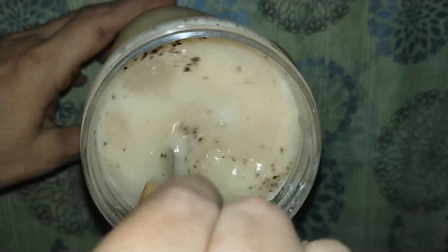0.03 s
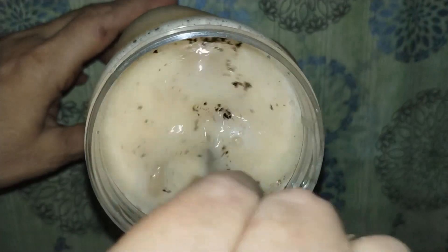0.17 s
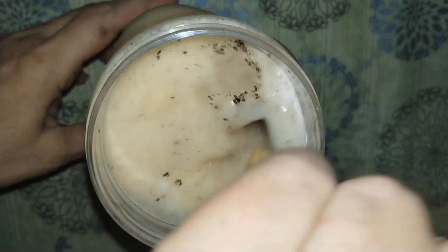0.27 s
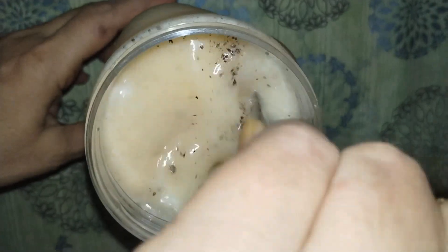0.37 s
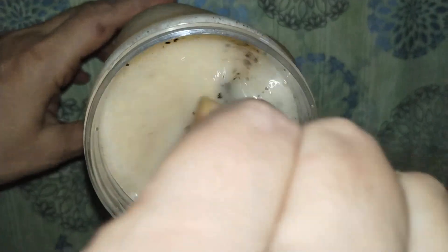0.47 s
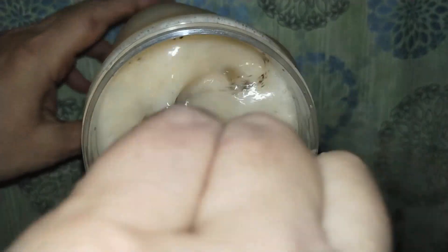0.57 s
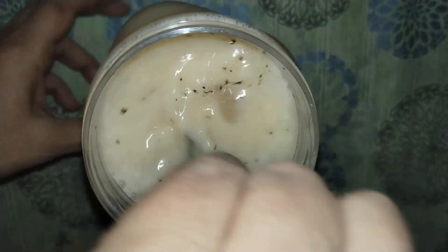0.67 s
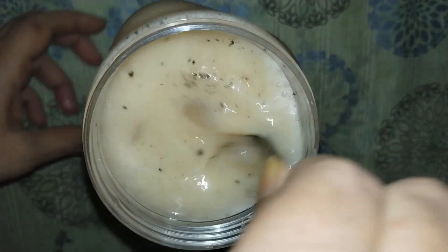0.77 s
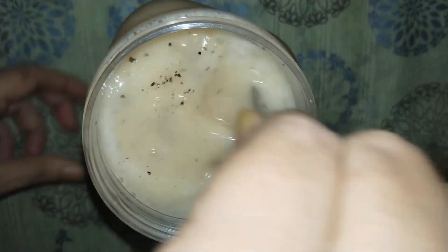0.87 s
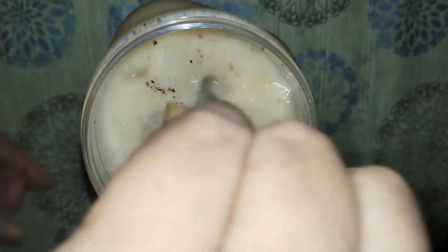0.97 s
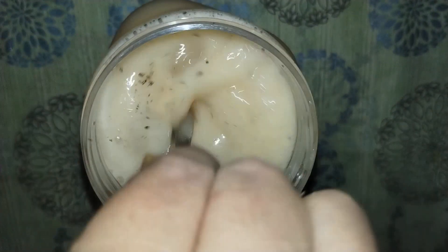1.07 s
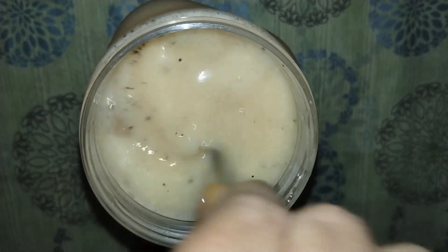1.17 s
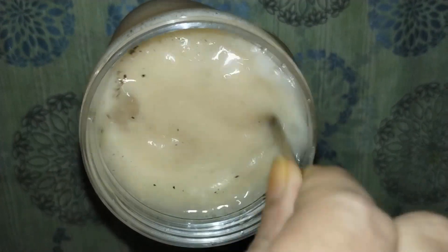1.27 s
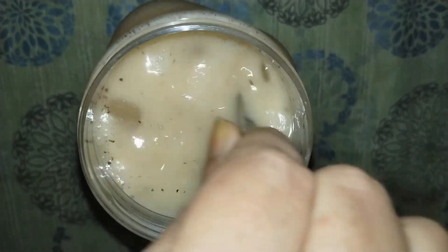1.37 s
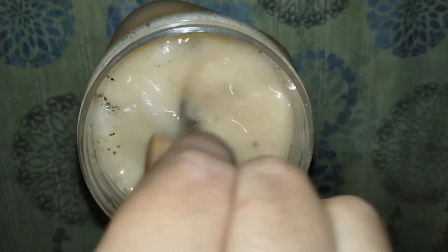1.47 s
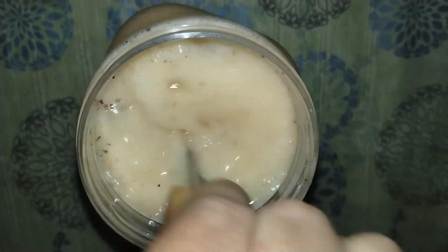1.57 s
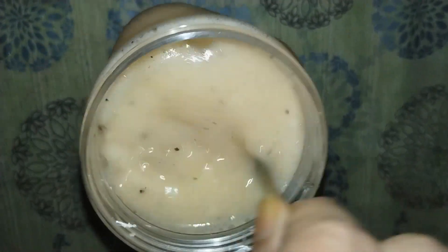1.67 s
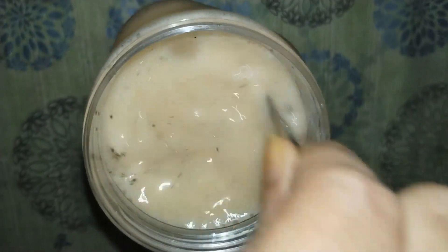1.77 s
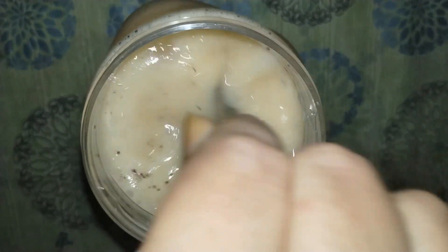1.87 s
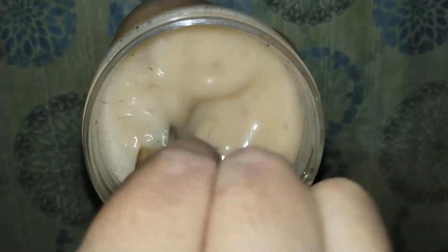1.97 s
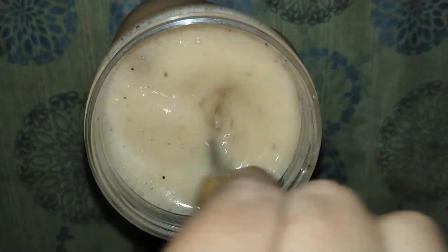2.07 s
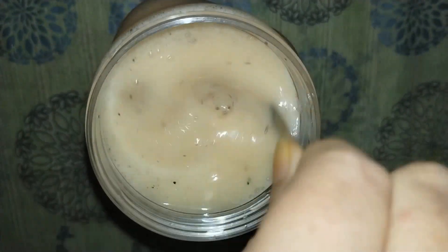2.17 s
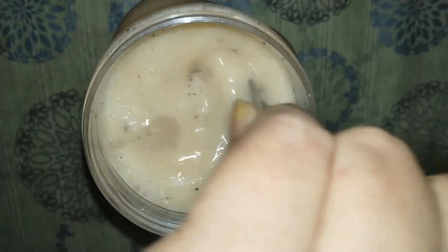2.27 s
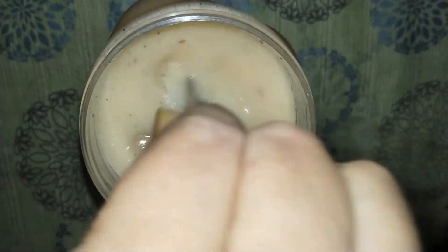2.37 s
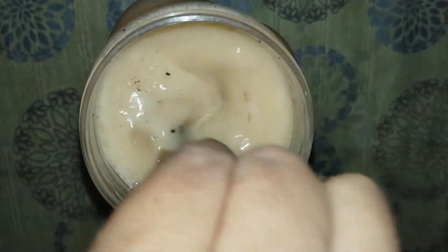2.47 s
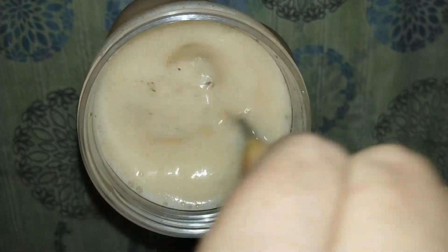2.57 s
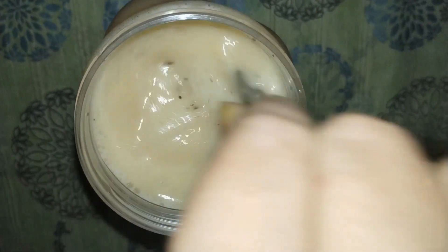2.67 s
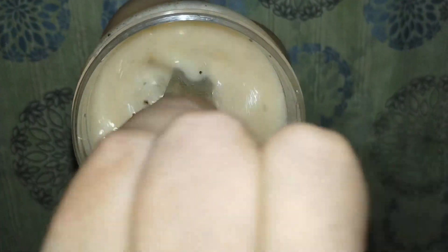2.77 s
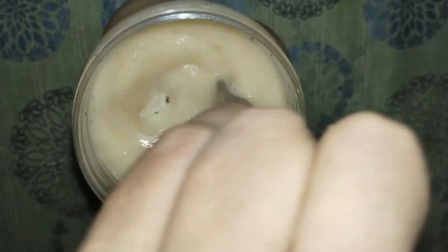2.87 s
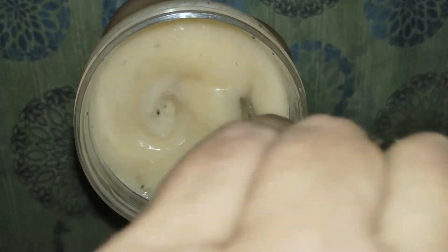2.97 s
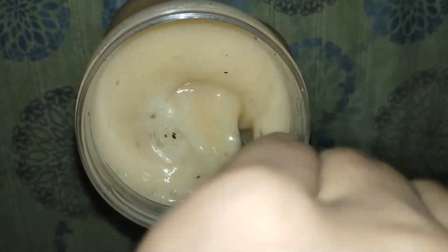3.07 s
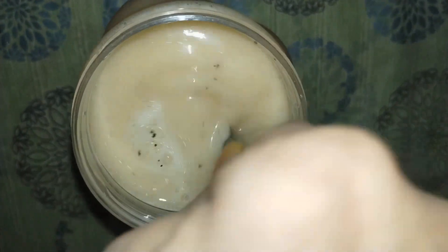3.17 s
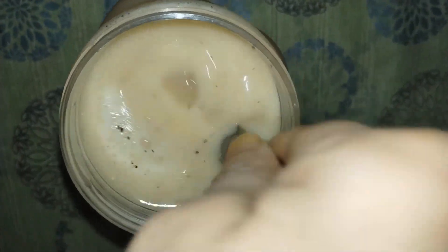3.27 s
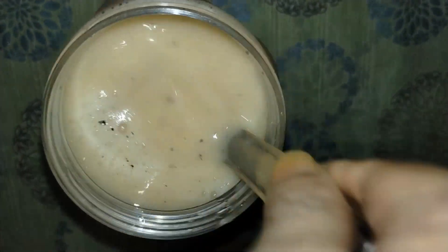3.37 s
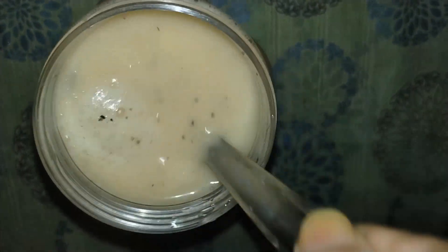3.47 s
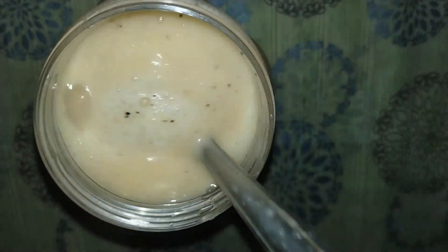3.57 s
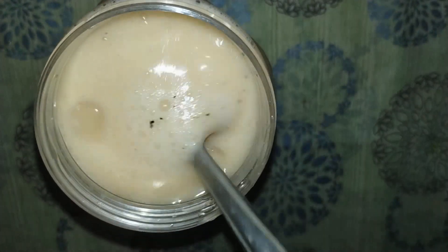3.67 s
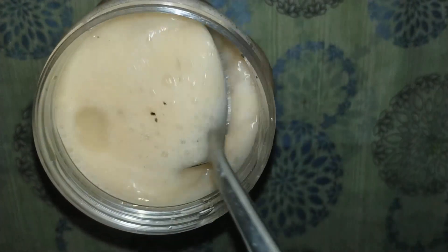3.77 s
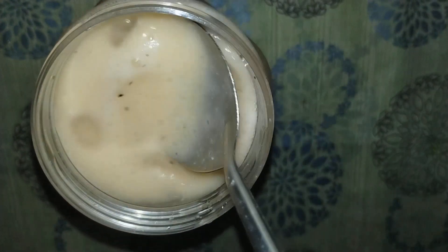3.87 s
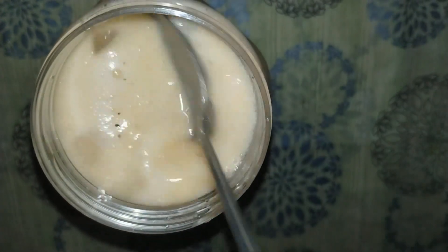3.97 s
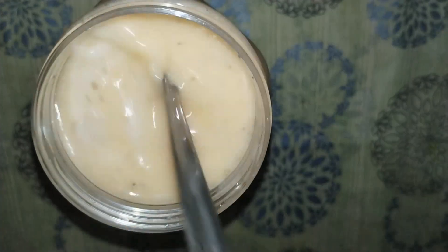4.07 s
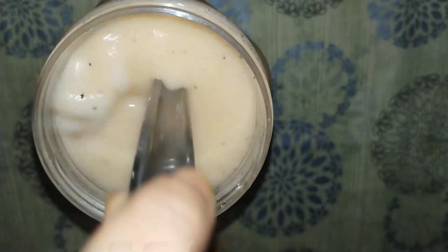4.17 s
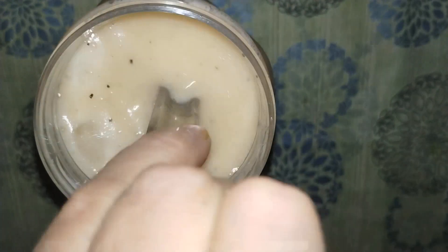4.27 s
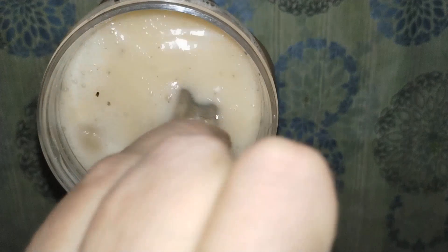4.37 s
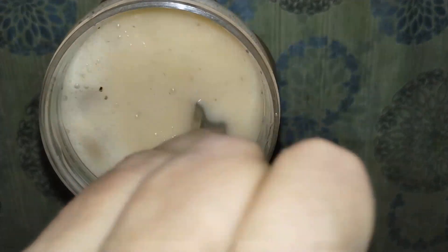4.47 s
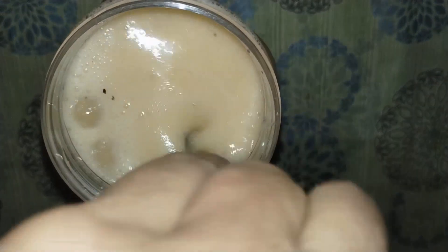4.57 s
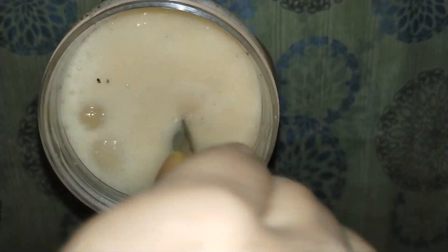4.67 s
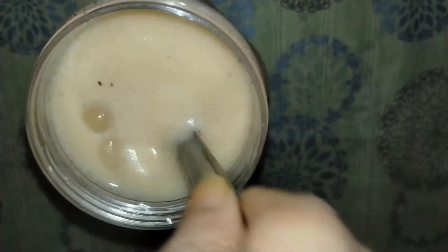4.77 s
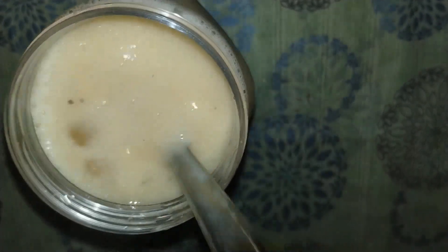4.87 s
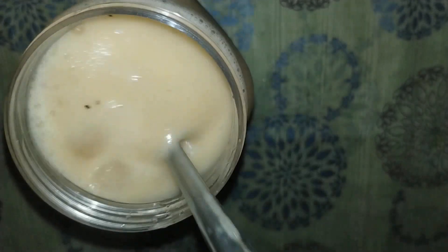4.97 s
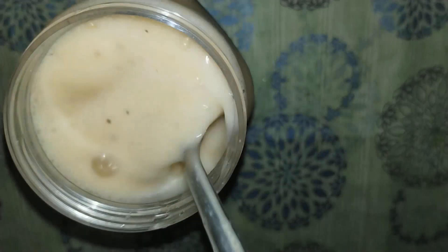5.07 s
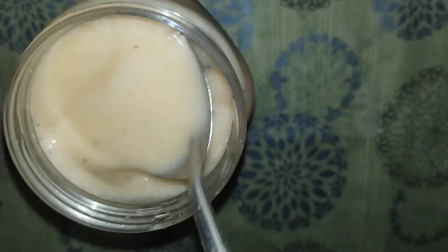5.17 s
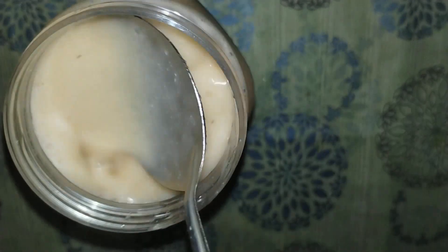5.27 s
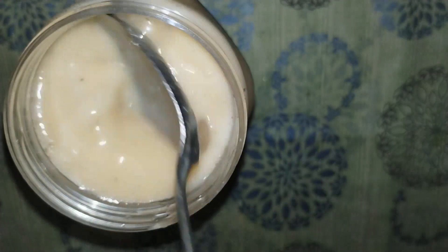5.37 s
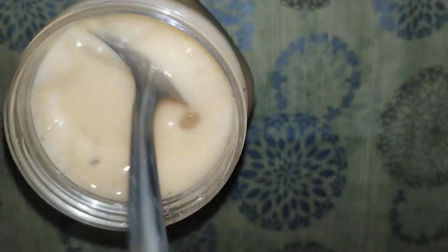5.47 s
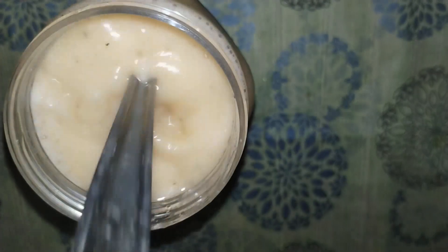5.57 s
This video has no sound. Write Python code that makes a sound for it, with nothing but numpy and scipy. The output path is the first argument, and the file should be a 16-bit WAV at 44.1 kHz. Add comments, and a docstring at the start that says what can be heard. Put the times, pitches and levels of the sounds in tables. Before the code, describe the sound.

A metal spoon briskly stirs a thick creamy drink in a glass jar, with wet clinks, gritty scrapes and low table thumps over a faint hum.

```python
"""A steel spoon stirs a thick iced drink in a glass jar on a table, heard at two ports just above.
From 0 s drink and ice slosh (noise, jar modes), the spoon hisses, the table booms and an appliance hums
(wandering sines) over the room's hiss. From 0.09 s spoon and ice knock the wall in short rattles (damped
modes, noise bursts), and from 0.16 s strokes grate (noise in grains). A faint low tone passes at 0.9-1.5 s;
knocks pause at 4.7-5.0 s, then resume to 5.6 s. A short room echo follows jar and spoon."""
import sys
import numpy as np
from scipy import signal
from scipy.fft import rfft, irfft
from scipy.io import wavfile
from scipy.ndimage import uniform_filter1d

SR = 44100
rng = np.random.default_rng(int(sys.argv[2]) if len(sys.argv) > 2 else 0)


def boost(x):
    """Linear amplitude factor 10**(x/20) for a level x in decibels (scalar or array-like)."""
    u = np.asarray(x, float) / 20
    return 10 ** u


def dump(signal):
    """Clip the signal to [-1, 1] and save it as 16-bit WAV at the path in sys.argv[1]."""
    limited = np.clip(np.atleast_2d(signal).T, -1, 1)
    pcm = np.round(limited * 32767).astype(np.int16)
    wavfile.write(sys.argv[1], SR, pcm)


N = 247665
T = np.arange(N) / SR
SIDES = np.array([[1], [-1]])  # opposite sign at the two ports

# stirring: start_s, hiss_db, slosh_db (relative)
STIR_LEVELS = [(0, -57.5, -43), (.42, -54, -42.5), (.56, -57, -39), (.7, -51.5, -40), (.95, -65, -41.5),
               (1.12, -58.5, -42.5), (1.47, -51, -41), (1.58, -52, -46), (1.8, -70, -37),
               (2.05, -54.5, -42.5), (2.27, -56, -42), (2.39, -42.5, -43), (2.52, -61, -47.5),
               (2.63, -57, -39), (2.85, -56, -46), (3.19, -56, -42), (3.28, -57, -47.5), (3.45, -57, -50.5),
               (3.57, -64, -50), (4.14, -61, -57), (4.35, -62, -37.5), (4.48, -55, -53), (4.68, -53, -44.5),
               (4.83, -64.5, -56.5), (5.45, -63.5, -59), (5.62, -90, -65)]
# colour of drink and ice: frequency_hz, gain_db
SLOSH_COLOUR = [(120, -9), (200, 1), (401, -11), (554, -3), (754, -6.5), (827, -13), (1030, -5.5),
                (1680, -7.5), (4660, -31), (8000, -52), (10400, -32), (17600, -120)]
# modes of the filled jar: frequency_hz, level_db (relative), nominal_t60_s
JAR_MODES = [(543, -4, .15), (571, -3, .2), (662, -1, .2), (701, -7, .15), (751, -6, .15), (866, -5, .15),
             (824, 3.5, .3), (1665, -1.5, .095), (1120, -3, .045), (1240, -4, .05), (1462, -4, .045),
             (1530, -4, .045), (1885, -3, .045), (2018, -3, .05), (2185, -3, .045), (2470, -4, .035),
             (3110, -3, .03), (3356, -2, .035), (3640, -4, .03), (4150, -4, .03)]
# colour of the scraping spoon: frequency_hz, gain_db
SCRAPE_COLOUR = [(530, 13.5), (900, -8), (1370, -2.5), (1830, 12), (3070, 2), (3380, 1.5), (4310, -1.5),
                 (4680, -4), (5960, -1), (9200, -5.5), (16000, -10)]
# modes of the wet spoon: frequency_hz, level_db (relative), nominal_t60_s
SPOON_MODES = [(5900, -3, .025), (7050, -4, .025), (8390, 0, .03), (8960, 0, .03), (9650, -1, .03),
               (10400, -1, .025), (11000, -4, .02), (12100, -4, .02)]
# grating strokes along the wall: peak_s, treble_db, rise_20db_ms, fade_20db_ms (both at least 2 ms in effect),
# brightest_hz, body_over_treble_db
GRATE_STROKES = [(0.158, -54.5, 8, 26, 7900, 5), (0.238, -52.5, 2, 5.5, 8800, 19),
                 (0.259, -56.5, 23, 22, 12100, 9), (0.313, -59, 7, 16, 5000, 15),
                 (.45, -66.5, 110, 43, 9800, 12), (0.502, -33.5, 24.5, 38, 8100, -3),
                 (0.566, -55.5, 19, 54, 6500, 4.5), (.64, -64, 52, 64, 8050, 3),
                 (0.792, -44.5, 9, 12, 7040, 9), (0.83, -38.5, -0.5, 15.5, 6960, 13),
                 (0.88, -47.5, 13, 20, 7900, 1.5), (0.966, -47.5, 50, 63, 7700, 3),
                 (1.031, -35.5, 40, 51, 10700, -4), (1.172, -43.5, 18, 30, 6500, 0),
                 (1.231, -34, 12, 34, 7740, -6.5), (1.31, -54.5, 21, 25, 5780, 11.5),
                 (1.431, -36, 25, 33, 7200, -5.5), (1.49, -59, 13, 30, 6025, 13),
                 (1.606, -43, 11, 79, 8110, -3.5), (1.693, -38, 20, 39, 10940, 1),
                 (1.762, -41, 11, 29, 5900, 9), (1.846, -43, 33, 40, 6200, -9),
                 (1.872, -27, 0.5, 13, 10700, -8.5), (1.931, -34, 36, 36, 8500, -1.5),
                 (2.073, -39, 3, 43, 7440, -2.5), (2.156, -35.5, 9.5, 34.5, 6780, 0.5),
                 (2.292, -62, 14, 33, 5870, 10.5), (2.336, -41, 22, 44, 10400, 0),
                 (2.389, -52, 37, 57, 10180, 9), (2.542, -40, 18, 22, 6060, -7),
                 (2.615, -48.5, 38, 46, 7800, 0.5), (2.669, -40, 9, 29, 7500, 4),
                 (2.8, -50, 17, 31, 7900, 2.5), (2.97, -72, 39, 40.5, 9220, -11),
                 (2.995, -40, 34, 43, 9060, 2.5), (3.052, -50, 17, 51, 7740, 4.5),
                 (3.09, -24.5, 6.5, 33, 8100, -1.5), (3.13, -50.5, 24.5, 47, 8350, 4),
                 (3.199, -54.5, 23, 18, 6830, 5.5), (3.315, -51, 23, 55, 7920, 0),
                 (3.438, -57.5, 97, 74, 9350, 3), (3.75, -35.5, 0, 10.5, 6496, -6),
                 (3.938, -34, -5, 24, 6240, -11), (4.165, -31.5, -6, 46, 8280, 1),
                 (4.205, -62, 7, 50, 7890, -6), (4.31, -62, 60, 40, 10970, 1),
                 (4.362, -62, 7, 62, 7500, 13), (4.421, -48.5, 6, 34, 6356, 11),
                 (4.508, -26.5, 3, 23, 9120, -2), (4.605, -50.5, 38, 43, 9140, 5.5),
                 (4.667, -57.5, 21, 47, 6930, 6), (5.097, -48, 2, 32, 6380, -2),
                 (5.389, -54, -1, 69, 8410, 6), (5.511, -40, -2, 8, 9570, -32),
                 (5.556, -47.5, -10, 43, 6980, 3)]
# boom of the table top as the jar is pushed about: start_s, pitch_hz, level_db
TABLE_BOOM = [(0.0, 125.7, -56), (0.2, 128.3, -48.5), (0.28, 126.7, -31), (0.44, 125.2, -46),
              (0.51, 125, -42), (0.7, 127, -30.5), (0.78, 125.2, -42), (0.83, 135, -28.5),
              (0.87, 133.7, -39.5), (1.08, 136, -47), (1.11, 133.2, -63), (1.27, 128.7, -28),
              (1.31, 128, -46), (1.36, 130.7, -33), (1.47, 134.2, -46), (1.55, 129.4, -31),
              (1.59, 128.3, -72), (1.64, 130.1, -38), (1.75, 139.5, -32.5), (1.84, 124.9, -45.5),
              (2.14, 125.5, -40), (2.19, 133, -26), (2.27, 124.6, -43.5), (2.33, 125, -37),
              (2.38, 137.6, -59), (2.44, 144, -32), (2.49, 137.3, -61), (2.58, 128.1, -50),
              (2.64, 133.8, -25), (2.74, 126.1, -43), (2.8, 133.6, -39.5), (2.92, 124.8, -44),
              (3.06, 139, -50), (3.14, 136.3, -34), (3.22, 138.5, -79), (3.28, 132.7, -45),
              (3.39, 135, -50), (3.45, 125.0, -52), (3.55, 125.4, -42), (3.8, 124.9, -47),
              (3.86, 128.1, -73), (4.14, 124.4, -48), (4.24, 134.7, -40.5), (4.29, 132.4, -63),
              (4.33, 128.5, -44), (4.72, 126.9, -39), (4.89, 125.3, -65), (4.96, 125.6, -51),
              (5.02, 124.5, -67), (5.12, 128, -42), (5.22, 129.2, -68), (5.3, 125.7, -39.5),
              (5.46, 127, -50), (5.62, 138.3, -47)]
# appliance hum: start_s, upper_tone_db, lower_tone_db
HUM_LEVELS = [(0.0, -48, -58), (0.84, -41.5, -61), (0.98, -47, -56), (2.41, -44.5, -64), (2.47, -45, -53),
              (3.57, -49, -70), (3.61, -52.5, -56), (4.63, -48.5, -63), (4.82, -55, -42),
              (4.94, -48.5, -58), (5.54, -55, -60), (5.62, -50, -62)]
# colour of the room's hiss, alike at both ports: frequency_hz, gain_db
AIR_COLOUR = [(15, -42), (25, -31), (78, -24), (108, 10), (149, 11.5), (190, -16.5), (300, -12), (476, -30),
              (659, -9), (1650, -31.5), (2280, -28), (5430, -37), (8590, -30.5), (16000, -48.5)]
# colour of the room's hiss, opposed at the ports: frequency_hz, gain_db
AIR_SIDE_COLOUR = [(15, -34.5), (25, 9), (149, -14), (335, 9), (476, -11), (863, 8), (5880, -16),
                   (7110, -25), (8590, -35), (16000, -56.5)]
# knocks on the wall: start_s, clack_db, clack_centre_hz, low_ring_db (relative to clack), low_ring_centre_hz,
# bright_tick_db (relative to clack)
WALL_KNOCKS = [(0.0922, -49, 900, 17.5, 544, -6), (0.154, -27.5, 960, -1, 553, -21),
               (0.2378, -14.5, 890, -10.5, 610, -1.5), (0.2882, -26, 1430, -21, 835, -14),
               (0.3117, -13.5, 910, -7, 923, -41), (0.4636, -26.5, 1210, -19, 570, -7),
               (0.5007, -14.5, 1870, -18, 756, -3), (0.562, -19, 890, -2, 930, -23),
               (0.6484, -26.5, 924, -3.5, 750, -11), (0.7233, -20, 1670, -7, 651, -9),
               (0.7885, -18, 1640, -4.5, 797, 2), (0.829, -8, 1320, -15.5, 950, -16),
               (0.952, -24, 1670, -14, 792, 2), (0.9725, -23, 3590, -33, 796, 0),
               (0.9824, -15.5, 1880, -15.5, 900, -2), (1.0115, -27, 4100, -30, 800, -33),
               (1.032, -10, 1670, -8, 898, -23), (1.0378, -11.5, 1650, -6, 815, -27),
               (1.0512, -18.5, 2500, -5, 742, -20), (1.066, -20, 1750, -11, 790, -12),
               (1.1714, -20.5, 1630, -7.5, 621, -18), (1.2318, -7, 1870, -17.5, 587, -3),
               (1.2378, -16, 2200, -38, 565, -24), (1.3089, -17, 1071, -5.5, 920, -13),
               (1.4073, -32, 1300, -3, 835, 12), (1.4305, -8.5, 2990, -27, 563, -22),
               (1.4385, -24.5, 4000, -12, 563, -42), (1.453, -35, 1240, -10, 659, -30),
               (1.491, -22, 1200, -9, 600, -1), (1.6092, -18, 2020, -12.5, 615, 7.5),
               (1.6808, -35, 2685, -1, 780, -19), (1.6937, -11, 911, -7, 820, 5),
               (1.7583, -11, 1250, -10, 783, -6), (1.8437, -26, 3560, -15, 792, -11),
               (1.8706, -27, 950, -32, 878, 16), (1.8866, -18.5, 1230, -10, 870, -6),
               (1.9263, -23.5, 930, -1, 517, 4), (2.0048, -35, 1210, -30, 674, -3),
               (2.0717, -12, 1632, -13.5, 658, 3), (2.156, -23, 1960, -1, 850, -8),
               (2.2124, -27.5, 978, -8.5, 572, -17), (2.2749, -36, 1650, -4, 546, -13),
               (2.2894, -23, 1600, -41, 559, -6), (2.3359, -16.5, 1168, -16.5, 957, -16),
               (2.355, -21.5, 1710, -11, 659, -27), (2.3877, -12.5, 1340, -9.5, 915, -4),
               (2.5411, -8.5, 1540, -12.5, 662, -26.5), (2.603, -12.5, 1107, -3.5, 619, -16),
               (2.6678, -14.5, 1100, -11.5, 820, -29), (2.6715, -17, 1910, -11, 840, -25),
               (2.7997, -16.5, 913, -5, 946, -5), (2.8996, -29, 1663, -25, 822, -9),
               (2.9392, -28, 2275, -32, 669, -31), (2.9806, -30, 1628, -20, 898, -22),
               (2.9956, -23, 1255, 2.5, 598, -34), (3.02, -38, 894, -9, 650, -16),
               (3.034, -27, 3567, -18, 817, 3), (3.0503, -16.5, 1095, -6, 862, -28),
               (3.0915, -11.5, 1740, -8, 810, -9), (3.129, -21, 1490, -2.5, 814, -3),
               (3.1993, -27, 1515, -9, 817, -8), (3.3104, -27.5, 1469, -13, 872, 12.5),
               (3.3713, -24, 1878, -16, 843, -39), (3.392, -39, 962, 6, 818, -6),
               (3.4137, -24, 977, 1, 857, -9), (3.702, -30, 1216, -33, 704, -27),
               (3.7299, -33, 1601, -30, 898, -13), (3.7512, -25, 1863, -7.5, 883, 7),
               (3.7928, -33, 1680, -14, 818, -40), (3.9389, -23.5, 1668, -8.5, 576, 6),
               (3.9634, -25, 1115, -10, 790, -20), (4.0005, -37, 2000, -18, 752, 1),
               (4.1655, -22, 3664, -3, 843, 6), (4.2048, -6, 1868, -16.5, 647, -9.5),
               (4.3271, -30.5, 1646, -2.5, 921, -17), (4.3585, -19, 1698, -6.5, 772, -17),
               (4.422, -14.5, 1181, -14.5, 858, -47), (4.4481, -21.5, 1500, -12, 677, -23),
               (4.5085, -4, 3330, -12, 683.3, -18), (4.515, -8.5, 1350, -8, 725, -11),
               (4.529, -25.5, 1260, 5, 665, -33), (4.6019, -18.5, 1620, -13, 560, -16),
               (4.6661, -18, 1686, -17, 663, -18.5), (5.012, -44, 2477, -40, 753, -35),
               (5.026, -50, 2506, -40, 762, -36), (5.0494, -21, 1544, -32, 760, -37.5),
               (5.0976, -18, 1580, -13.5, 835, -28), (5.111, -28, 1620, -8, 743, -40),
               (5.1215, -20.5, 1670, -34, 807, -38), (5.127, -24, 1127, -29, 824, -40),
               (5.156, -39, 2540, -10, 824, -19), (5.287, -42, 3020, -42, 758, -43),
               (5.3885, -12, 2278, -20.5, 835, 4), (5.411, -27.5, 1665, -7.5, 824, -29),
               (5.5123, -23.5, 2340, -44, 850, 3), (5.5557, -16.5, 1752, -8.5, 807, -11),
               (5.5917, -26, 2010, -2.5, 760, -25)]
# modes of the table under the jar: frequency_hz, level_db (relative), nominal_t60_s
TABLE_MODES = [(165.6, 1, 0.34), (189.7, 14, 0.14), (248, 23, 0.06), (248, 5.5, 0.3)]
# faint low tone that comes and goes: start_s, pitch_hz, level_db
FAINT_TONE = [(.85, 166, -90), (.9, 172, -52), (1.03, 176, -53), (1.1, 176, -46), (1.28, 177, -48),
              (1.38, 180, -60), (1.5, 190, -90)]
# colour difference of the ports: frequency_hz, left_minus_right_db
PORT_COLOUR = [(60, 1.5), (110, 0.5), (200, 1), (380, -1.5), (700, 3), (1290, -1.5), (2380, 1),
               (4400, -2.5), (8120, 4.5), (15000, 7)]

RING_TOP_HZ = 950  # splits the jar's low ring from its upper modes


def shape(x, points):
    """Colour by (Hz, dB) points, interpolated over log frequency."""
    hz, db = np.transpose(points)
    f = np.arange(N // 2 + 1) * SR / N + 1
    return irfft(rfft(x) * boost(np.interp(np.log(f), np.log(hz), db)), N)


def unit(x):
    """Rms 1."""
    return x / np.sqrt(np.mean(x ** 2))


def peak_one(x):
    """Scale so that the loudest few milliseconds have rms 1."""
    return x / np.sqrt(uniform_filter1d(np.mean(x ** 2, 0), 256).max())


def curves(table):
    """Columns of a table at every sample."""
    s, *columns = np.transpose(table)
    return [np.interp(T, s, c) for c in columns]


def walk(rate_hz):
    """Random levels held 1 / rate_hz s and slewed twice; rms 1."""
    k = int(SR / rate_hz)
    held = np.repeat(rng.standard_normal(N // k + 1), k)
    return unit(uniform_filter1d(uniform_filter1d(held, k), k)[:N])


def pair(alike):
    """Two noises that share part of their course."""
    mid, side = rng.standard_normal((2, N))
    return np.sqrt(1 + alike) * mid + np.sqrt(1 - alike) * side * SIDES


def band(x, lo_hz, hi_hz):
    """Band-pass."""
    return signal.sosfilt(signal.butter(2, [lo_hz, hi_hz], "band", fs=SR, output="sos"), x)


def decay(x, fade_ms):
    """Exponential tail with time constant fade_ms after every impulse."""
    return signal.lfilter([1], [1, -np.exp(-1000 / (fade_ms * SR))], x)


def swells(s, db, rise_s, fade_s):
    """Gain of each event: it swells to its peak and fades evenly in dB, 20 dB per rise_s or fade_s."""
    late = T - s[:, None]
    span = np.where(late < 0, rise_s[:, None], fade_s[:, None]).clip(.002)
    return boost(db[:, None] - 20 * np.abs(late) / span)


def slosh():
    """Drink and ice murmur as coloured noise, excite the low jar modes and swell after every knock."""
    wake_db, wake_fade_s = -33, 0.062  # level under the knock, time to fade 20 dB
    _, slosh_db = curves(STIR_LEVELS)
    murmur = shape(pair(0.67), SLOSH_COLOUR)
    hums = 0
    for hz, db, _ in JAR_MODES:
        if hz < RING_TOP_HZ:
            hums = hums + boost(db + 6 * walk(22)) * band(murmur, hz * .975, hz * 1.025)
    s, db = np.transpose(WALL_KNOCKS)[:2]
    wake = swells(s, db + wake_db, 0 * s, wake_fade_s + 0 * s).sum(0)
    return (boost(slosh_db - 4) + wake) * boost(1.77 * walk(37)) * unit(murmur + 1.4 * hums)


def grains(rate_hz, spread_db, fade_ms):
    """Envelope of tiny separate catches of very uneven size."""
    size_db = spread_db * rng.exponential(size=N).clip(0, 4)
    catch = (rng.random(N) < rate_hz / SR) * boost(size_db)
    return unit(decay(catch, fade_ms))


def scraping():
    """The spoon hisses and grates along the wall in clustered grains that set its own modes singing."""
    body_top_hz, hump_oct, hump_db, above_db_oct = 4600, .35, 11.5, 7
    hiss_db, _ = curves(STIR_LEVELS)
    s, db, rise_ms, fade_ms, top_hz, body_db = np.transpose(GRATE_STROKES)
    stroke = swells(s, db, rise_ms / 1000, fade_ms / 1000)
    rub = shape(pair(.5), SCRAPE_COLOUR)
    sing = rub
    for hz, mode_db, _ in SPOON_MODES:
        sing = sing + boost(mode_db - 3 + 6 * walk(30)) * band(rub, hz * .98, hz * 1.02)
    shared = grains(rate_hz=350, spread_db=3.5, fade_ms=1.8)
    grate = swish = 0
    for k, hz in enumerate(800 * 1.35 ** np.arange(11)):
        # neighbouring bands have opposite sign
        part, plain = (-1) ** k * band(np.array([sing, rub]), hz / 1.16, hz * 1.16)
        # each part of the spectrum catches and slips partly on its own
        own = grains(rate_hz=200, spread_db=3.5, fade_ms=2)
        grit = unit(.3 + shared + own) * boost(3 * walk(60))
        # treble falls away from the brightest frequency, further above it
        octaves = np.log2(hz / top_hz)
        hump = -hump_db * (1 - np.exp(-(octaves / hump_oct) ** 2))
        tone_db = body_db if hz < body_top_hz else hump
        tone_db = tone_db - above_db_oct * octaves.clip(0)
        grate = grate + boost(tone_db) @ stroke * grit * unit(part)
        swish = swish + boost(3.5 * walk(30)) * (1.2 + grit) * plain
    return grate + boost(hiss_db + 1.6 * walk(29.56)) * unit(swish)


def drone(hz, db, waver_hz, flutter_db, rate_hz):
    """A low sine whose pitch and level wander."""
    phase = 2 * np.pi * np.cumsum(hz + waver_hz * walk(rate_hz)) / SR
    return np.sqrt(2) * boost(db + flutter_db * walk(rate_hz)) * np.sin(phase)


def table_boom():
    """The table top booms at a wandering pitch as the jar is pushed about."""
    return drone(*curves(TABLE_BOOM), waver_hz=2.5, flutter_db=1.5, rate_hz=25)


def appliance_hum():
    """Two low tones, the lower less steady."""
    upper_db, lower_db = curves(HUM_LEVELS)
    upper = drone(97.0, upper_db, waver_hz=.4, flutter_db=1.5, rate_hz=7)
    return upper + drone(72.5, lower_db, waver_hz=2.5, flutter_db=3.5, rate_hz=12)


def room_air():
    """Coloured noise, partly alike and partly opposed at the ports, with a slowly wandering level."""
    air = boost(-49.5) * unit(shape(rng.standard_normal(N), AIR_COLOUR))
    air = air + boost(-63.5) * unit(shape(rng.standard_normal(N), AIR_SIDE_COLOUR)) * SIDES
    return air * boost(1.0 * walk(5.9))


def rattles(n, length_ms=9, count=6):
    """Each knock is a first contact and a few weaker bounces; one row of impulses a knock."""
    chance = rng.random((len(WALL_KNOCKS), 2, count))
    late = chance[:, 0] * (np.arange(count) > 0)
    place = (late * length_ms * SR / 1000).astype(int)
    size = np.where(late > 0, .42 * np.exp(-late) * chance[:, 1], 1)
    hits = np.zeros((len(WALL_KNOCKS), n))
    np.add.at(hits, (np.arange(len(WALL_KNOCKS))[:, None], place), size)
    return hits


def rings(modes, centre_hz, hit, focus_oct, depth_db, spread, rise_ms, detune, linger, scatter_db=1.5,
          soft_db_oct=0):
    """Damped modes, detuned and damped anew at each blow; depth_db cuts (negative: lifts) those off centre."""
    hz, db, t60_s = np.transpose(modes)[:, :, None]
    t = np.arange(len(hit)) / SR
    chance = rng.standard_normal((6, len(modes), 1))
    octaves = np.log2(hz / centre_hz)
    gain = boost(db + scatter_db * chance[0] - depth_db * (1 - np.exp(-(octaves / focus_oct) ** 2)))
    gain = gain * boost(-soft_db_oct * octaves.clip(0))  # a blunt blow barely reaches the higher modes
    slow = np.exp(-np.log(1000) * t / (t60_s * np.exp(.25 * chance[1])))
    # the thick drink soaks up most of the ring at once; a remnant lingers
    fade = gain * (linger * slow + (1 - linger) * slow ** 3)
    # the moving drink makes every mode flutter
    flutter = np.repeat(rng.standard_normal((len(modes), len(t) // 400 + 1)), 400, 1)
    fade = fade * boost(4 * uniform_filter1d(flutter, 400)[:, :len(t)])
    # the pitch bends a little as the drink climbs or leaves the wall
    turn = 2 * np.pi * hz * (1 + detune * (chance[2] + 12 * chance[5] * t)) * t
    # where the wall is struck sets each mode's phase at the two ports
    both = np.array([np.sum(fade * np.sin(turn + spread * chance[3 + k]), 0) for k in range(2)])
    both = both * (1 - np.exp(-t * 1000 / rise_ms))
    return peak_one(signal.fftconvolve(both, hit[None], axes=1)[:, :len(t)])


def crack(lo_hz, hi_hz, hit, fade_ms, alike):
    """Dense, quickly damped vibration at each contact: band-passed noise."""
    noise = rng.standard_normal((3, len(hit)))
    burst = (noise[:2] + alike * noise[2]) * decay(hit, fade_ms)
    return peak_one(band(band(burst, lo_hz, hi_hz), lo_hz, hi_hz))


def low_ring(hit, centre_hz):
    """Low jar modes with a dull crack and a thud of the table."""
    low = [m for m in JAR_MODES if m[0] < RING_TOP_HZ]
    ring = rings(low, centre_hz, hit, focus_oct=.12, depth_db=14, spread=.5, rise_ms=1, detune=.007,
                 linger=.3, scatter_db=3)
    ring += boost(-10.5) * crack(540, 1250, hit, fade_ms=14, alike=1)
    thud = rings(TABLE_MODES, 217, hit, focus_oct=.7, depth_db=12, spread=1.2, rise_ms=20, detune=.05,
                 linger=.45)
    return ring + boost(-18) * thud


def clack(hit, centre_hz, tick_db):
    """Upper jar modes and cracks; a soft, wet contact is narrow and rounded, a hard one wide and clicking."""
    soft = np.interp(tick_db, (-36, -10), (1, 0))
    high = [m for m in JAR_MODES if m[0] > RING_TOP_HZ]
    quick = boost(-11.5) * rings(high, centre_hz, hit, focus_oct=0.19, depth_db=14 + 7.72 * soft, spread=1.4,
                               rise_ms=0.42 + 0.44 * soft, detune=0.0025, linger=.25 + .25 * soft,
                               scatter_db=3, soft_db_oct=9)
    width = np.interp(tick_db, (-36, -24, -8), (1.12, 1.5, 1.9))
    body = crack(centre_hz / width, centre_hz * width, hit, fade_ms=2.5, alike=0.059)
    click = crack(centre_hz / 2, min(centre_hz * 2, 5000), hit, fade_ms=.8, alike=.8)
    return quick + boost(-17.5 - 1.3 * soft) * body + boost(-15 - 20 * soft) * click


def bright_tick(hit):
    """Treble crack and the ringing modes of the spoon."""
    tick = crack(3700, 9500, hit, fade_ms=2.5, alike=0.16)
    ring = rings(SPOON_MODES, 8500, hit, focus_oct=1, depth_db=-22, spread=0.17, rise_ms=.1, detune=.02,
                 linger=.3)
    return tick + boost(-4.5) * ring


def knocks(n=12288):
    """Each rattle of spoon or ice drives low ring, clack and bright tick."""
    out = np.zeros((2, N + n))
    for (s, db, hz, ring_db, ring_hz, tick_db), hit in zip(WALL_KNOCKS, rattles(n)):
        at, short = int(s * SR), hit[:n // 3]
        out[:, at:at + n] += boost(db + ring_db - 5.5) * low_ring(hit, ring_hz)
        sharp = clack(short, hz, tick_db) + boost(tick_db - 26.0) * bright_tick(short)
        out[:, at:at + n // 3] += boost(db) * sharp
    return out[:, :N]


def right_port(x, lag_hz=5500):
    """Phase lag growing to one turn at lag_hz (a fixed delay below it) and no further above."""
    f = np.arange(N // 2 + 1) * SR / N
    return irfft(rfft(x) * np.exp(-2j * np.pi * np.minimum(f / lag_hz, 1)), N)


def room_echo(near):
    """Convolution with decaying, band-limited noise that starts after 4 ms."""
    t60_s, level_db, dull_hz = 0.12, -14, 8000
    t = T[:SR // 2]
    tail = rng.standard_normal((2, len(t))) * np.exp(-np.log(1000) * t / t60_s) * (t > .004)
    tail = band(tail, 174, dull_hz)
    tail = tail / np.sqrt(np.sum(tail ** 2) / 2)
    return boost(level_db) * signal.fftconvolve(near, tail, axes=1)[:, :N]


def faint_tone():
    """A faint low tone that comes, rises in pitch and goes."""
    return drone(*curves(FAINT_TONE), waver_hz=1.0, flutter_db=1.0, rate_hz=12)


def scene():
    """Jar and stirring near the ports, their echo, then table, hum, faint tone and air."""
    near = slosh() + scraping() + knocks()
    near[1] = right_port(near[1])
    low = table_boom() + appliance_hum() + faint_tone()
    return near + room_echo(near) + low + room_air()


def roll_off(x):
    """The treble ends steeply here."""
    return signal.sosfilt(signal.butter(12, 16000, fs=SR, output="sos"), x)


def record(dry):
    """The two ports differ in colour, half the difference on each."""
    left = shape(dry[0], [(hz, db / 2) for hz, db in PORT_COLOUR])
    right = shape(dry[1], [(hz, -db / 2) for hz, db in PORT_COLOUR])
    return roll_off(np.array([left, right]))


dry = scene()
out = record(dry)
dump(out)
```